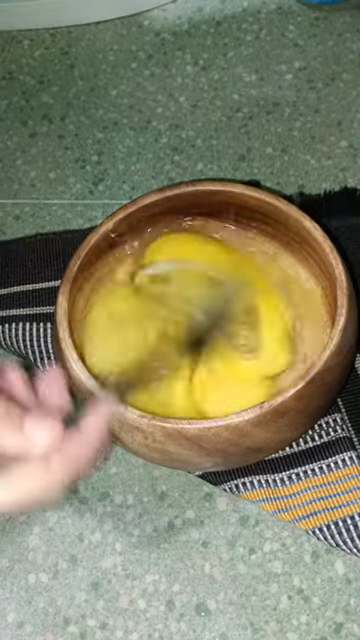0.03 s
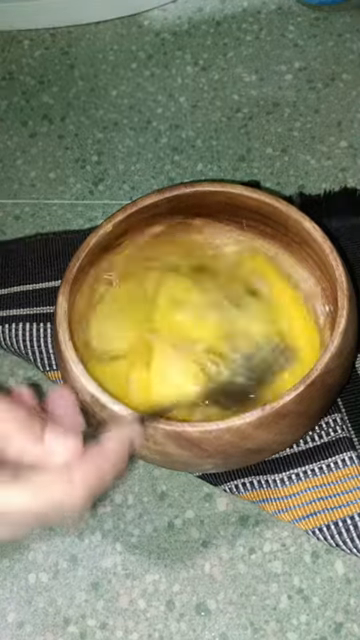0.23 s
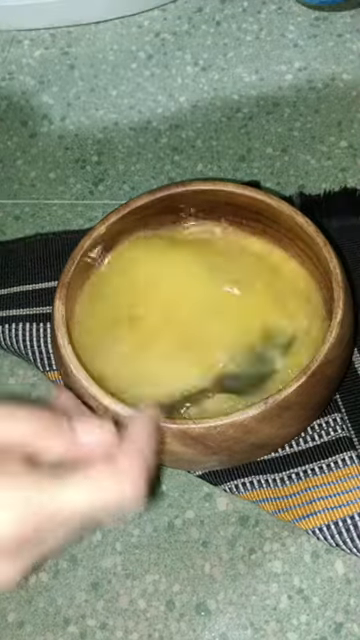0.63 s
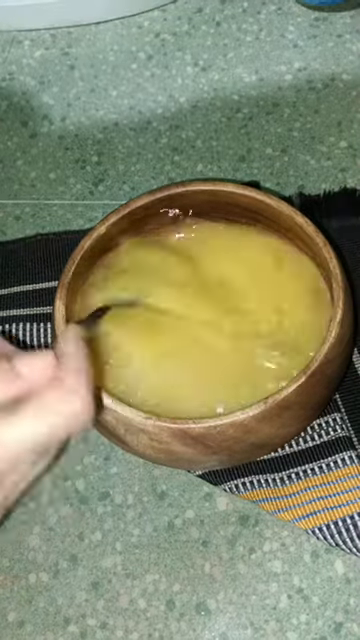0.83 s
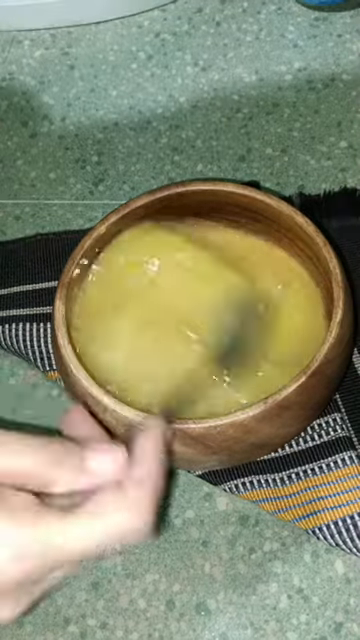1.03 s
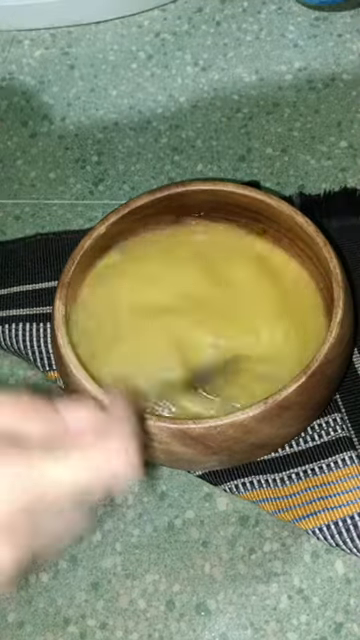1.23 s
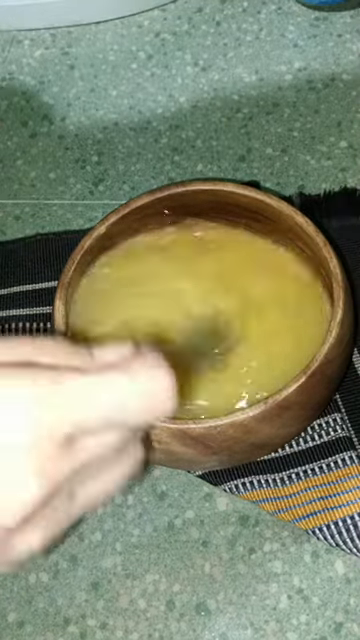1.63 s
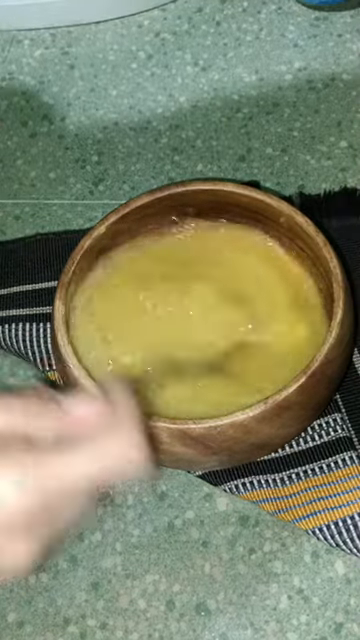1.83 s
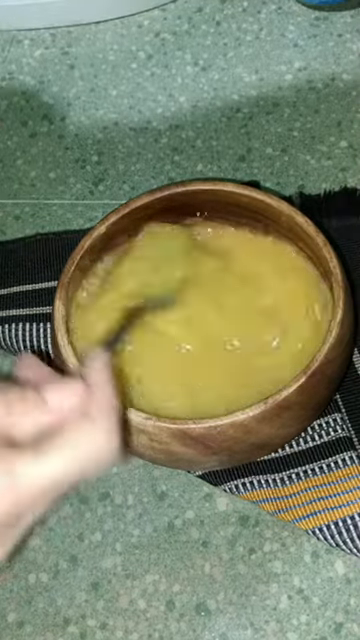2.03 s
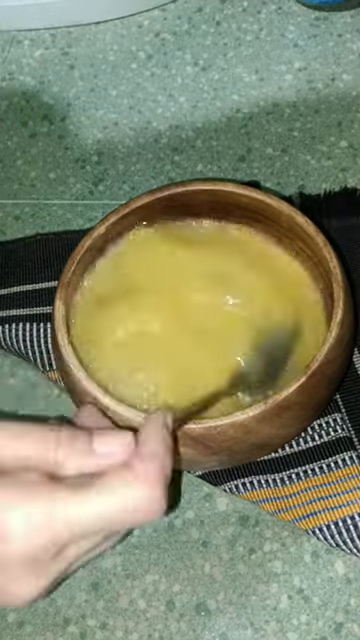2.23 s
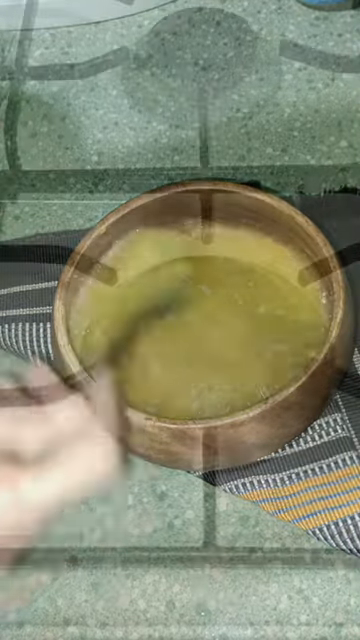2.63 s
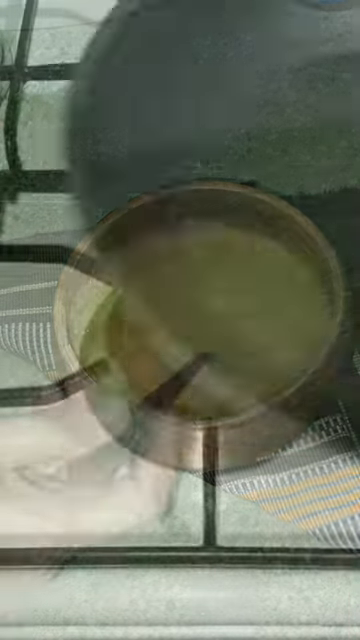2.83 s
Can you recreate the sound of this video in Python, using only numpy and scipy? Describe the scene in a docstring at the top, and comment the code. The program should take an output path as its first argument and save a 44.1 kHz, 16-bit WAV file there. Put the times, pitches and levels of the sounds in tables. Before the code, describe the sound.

Eggs being whisked with a fork, quick clacks and sloshes against a wooden bowl.

```python
"""A fork beats eggs in a wooden bowl on the counter of a small kitchen, about seven strokes a second.
From the first stroke, impacts ring the bowl, stick-slip friction rasps along the wood, and the egg
sloshes, sprays and gulps as trapped air resonates. Near 0.65 s a low rumble stops and the sound cuts
out twice for an instant. The spray then grows as the egg thins. From 2.2 s a thin hiss fades in,
and a faint tone rings under the last strokes."""
import sys
import numpy as np
from scipy import signal
from scipy.fft import rfft, irfft
from scipy.io import wavfile
from scipy.ndimage import uniform_filter1d

SR = 44100
rng = np.random.default_rng(int(sys.argv[2]) if len(sys.argv) > 2 else 0)


def wav_record(signal):
    """Record a signal, one row per channel, as 16-bit PCM in the file named by sys.argv[1]."""
    frames = np.transpose(np.atleast_2d(signal))
    bounded = np.clip(frames, -1, 1)
    # unit amplitude maps onto the largest positive 16-bit level
    quanta = np.round(bounded * 32767).astype(np.int16)
    wavfile.write(sys.argv[1], SR, quanta)


N = 132300

# Background spectra. Each row: frequency in Hz, relative density in dB.
AIR = [(25, -4.5), (60, -3.5), (150, 3.5), (280, -8), (600, -10.5), (1000, -7), (2100, -11.5),
       (3900, -16.5), (6000, -13.5), (11500, -25.5), (15500, -28)]
RUMBLE = [(20, -21), (45, 1.5), (90, -4), (140, -6.5), (220, -20), (500, -84)]
HISS = [(2000, -32), (6600, -19), (7350, 17), (8100, -35), (12000, -19)]
# Instants of silence. Each row: start in seconds, end in seconds.
DROPOUTS = [(0.637, 0.647), (0.680, 0.689)]
# Faint ringing. Each row: start in seconds, length in seconds, frequency in Hz, level in dB.
TONES = [(2.701, 0.16, 531, -57)]

# Reverberation of the kitchen. Each row: frequency in Hz, time to fall 60 dB in seconds.
ROOM_T60 = [(200, 0.38), (700, 0.17), (7000, 0.15)]
# Stereo balance. Each row: frequency in Hz, left minus right in dB.
BALANCE = [(100, 8), (350, -6), (620, -0.5), (1300, -7), (2800, -3.5), (11000, -2)]
ROOM_DB, LOW_CUT_HZ = -10.5, 348
WALLS_DB, WALLS_T60_S, WALLS_CUT_HZ, LEFT_LAG_SAMPLES = 1.5, 0.022, 920, 5

# Spectra of heavy slosh and fine spray. Each row: frequency in Hz, relative density in dB.
SLOSH = [(250, -15), (1200, -10.5), (2400, -2.5), (7000, -13), (15000, -82)]
SPRAY = [(1000, -25), (5000, 0.5), (8500, -4.5), (14700, -8.5), (15500, -13)]
# Spray grows as the egg thins. Each row: time in seconds, level against the scrape's treble in dB.
SPRAY_GROWTH = [(0.5, -11), (1.5, -6)]
SLOSH_DB, SLOSH_HANG_S, SPRAY_HANG_S = -8.5, 0.012, 0.0069
PULSES_PER_S, PULSE_SPREAD_DB, LEAD_S = 7700, 3.5, 0.014
# Air pockets in the egg. Each row: start in seconds, length in seconds, pitch in Hz, level in dB.
GULPS = [(0.219, 0.015, 1070, -49), (0.501, 0.00727, 1077, -52.5), (0.738, .04, 950, -55.5),
         (0.799, .008, 845, -50), (1.039, 0.016, 996, -47.5), (1.172, 0.06, 784, -50),
         (1.265, 0.018, 914, -49), (1.321, 0.11, 940, -45), (1.332, 0.073, 450, -48.5),
         (1.616, 0.045, 700, -51), (1.987, 0.03, 1040, -54), (2.156, 0.036, 787, -52),
         (2.298, .04, 1170, -48), (2.419, 0.016, 536, -56), (2.575, 0.039, 564, -45.5),
         (2.833, 0.023, 960, -54.5)]
BUBBLES_PER_S, BUBBLE_SPREAD, BUBBLE_CYCLES, BUBBLE_RISE_PER_S = 800, 0.29, 2.57, 4.6

# The fork rubs the bowl's floor. Each row: start in seconds, length in seconds, level in dB.
DRAGS = [(0.09, 0.026, -46), (0.374, 0.033, -44)]
DRAG_HZ, DRAG_WIDTH_HZ = 652, 46
# Tines slide on wood. Each row: start and length in seconds, crest as a share of the length,
# middle, treble and squeal levels in dB.
SCRAPES = [ (0.088, 0.037, 0.3, -40, -43.5, -70), (0.142, 0.027, 0.22, -37.5, -29, -36),
           (0.223, 0.028, 0.46, -45.5, -43, -70), (0.373, 0.042, 0.9, -42, -47, -64),
           (0.421, 0.026, 0.38, -38, -31, -29), (0.538, 0.039, 0.5, -43, -32, -28),
           (0.647, 0.017, 0.09, -36.5, -39.5, -68), (0.692, 0.08, 0.77, -41.5, -37, -49),
           (0.818, 0.031, 0.35, -51.5, -42, -56), (0.972, 0.02, 0.75, -46, -37.5, -64),
           (1.037, 0.022, 0.23, -37, -34, -41), (1.112, 0.015, 0.75, -38.5, -38.5, -60),
           (1.163, 0.044, 0.073, -36, -35, -46), (1.259, 0.022, 0.99, -43.5, -37.5, -67),
           (1.307, 0.041, 0.28, -34.5, -37.5, -57), (1.363, 0.11, 0.082, -51, -51.5, -68),
           (1.439, 0.053, 0.98, -45.5, -46, -62), (1.534, 0.02, 0.95, -50, -35.5, -60),
           (1.573, 0.07, 0.67, -38, -41, -45.5), (1.698, 0.032, 0.48, -40.5, -35.5, -47),
           (1.868, 0.043, 0.8, -45.5, -37.5, -45), (1.933, 0.018, 0.41, -36, -41.5, -64),
           (2.013, 0.041, 0.69, -41, -31, -35), (2.145, 0.027, 0.72, -46, -36, -38.5),
           (2.174, 0.042, 0.43, -38.5, -33, -41), (2.311, 0.05, 0.63, -36, -33, -42),
           (2.487, 0.035, 0.54, -38, -34.5, -47), (2.579, 0.022, 0.52, -38.5, -42.5, -68),
           (2.711, 0.024, 0.99, -39, -39, -72), (2.763, 0.031, 0.92, -52.5, -60, -76)]
# Spectrum of tines against wood. Each row: frequency in Hz, relative density in dB.
RASP = [(240, -45.5), (400, -29), (605, -12), (1190, -4.5), (2090, -2), (2320, -5.5), (4560, -4),
        (5480, -3.5), (11600, -14), (14100, -13), (15500, -25.5)]
# Resonances under the sliding tines. Each row: frequency in Hz, width in Hz, lift in dB.
TINE_MODES = [(1180, 174, 7), (2072, 220, 7.5), (2610, 310, 8.5), (3360, 790, 5.5), (6140, 310, 4),
              (11450, 750, 9.5)]
TINE_DRIFT = 0.027  # relative retuning from stroke to stroke
SWELL_DB, TAPER_DB, BITE_S, LIFT_S = 7.5, 6.5, 0.0044, 0.0083
SLIPS_PER_S, SLIP_SPREAD_DB, JUDDER_DB, JUDDER_S = 4000, 3.5, -1.5, 0.002
SQUEAL_HZ, SQUEAL_HALF_WIDTH_HZ = 4725, 164

# The fork strikes the bowl. Each row: start in seconds, body, middle and treble levels in dB,
# spot from 0 (floor) to 1 (wall).
KNOCKS = [(0.115, -23, -29, -35.5, 0.076), (0.1468, -48, -35.5, -27.5, 0), (0.245, -15, -18, -25, 0.13),
          (0.4199, -46, -38, -27, 0.075), (0.504, -58, -53, -34.5, 1), (0.541, -60, -37.5, -32.5, 0.42),
          (0.56, -65, -37, -32.5, 0.51), (0.652, -32.5, -53, -36.5, 1), (0.696, -32.5, -37, -36.5, 1),
          (0.8035, -44, -36, -41.5, 0), (0.9142, -28, -22.5, -28, 1), (0.983, -33, -30, -38, 0.99),
          (1.044, -53, -34, -33.5, 0.38), (1.126, -27, -34, -30.5, 0.54), (1.139, -23.5, -36, -32.5, 0),
          (1.17, -47, -45, -28, 0.41), (1.2765, -35.5, -38, -29.5, 1), (1.547, -44, -43, -37, 1),
          (1.575, -66, -34.5, -38.5, 0.81), (1.803, -46.5, -35, -35, 0.78), (1.936, -38, -35.5, -46, 1),
          (2.018, -54, -35.5, -42, 1), (2.164, -48, -33.5, -32, 0.86), (2.310, -37.5, -37, -43, 0.99),
          (2.444, -42.5, -41.5, -34.5, 0.77), (2.573, -34, -42.5, -40, 0.97), (2.589, -43, -45, -36, 1),
          (2.915, -53.5, -44.5, -57, 0.81)]
# Offsets to every knock: body, middle and treble in dB.
KNOCK_TRIM_DB = [-2, -2.5, -2]
# Modes of the bowl. Each row: frequency in Hz, level in dB when struck on the floor,
# level in dB when struck on the wall, time to fall 60 dB in seconds.
BOWL_MODES = [(400.6, -19, -10.5, 0.064), (463, -11.5, -19, 0.11), (642, 7.5, -17.5, 0.086),
              (721, 2.5, -0.5, 0.077), (1190, -22, -10, 0.11), (1480, -11, 4.5, 0.093),
              (2014, 3.5, 4.5, 0.072), (2280, 10, -18, .04), (2706, 13, 4, 0.018), (3376, -10, -6.5, 0.11),
              (5370, 15, -21, 0.029), (6460, 10.5, 8, 0.05)]
# Colour of the crack. Each row: frequency in Hz, gain on the floor in dB, gain on the wall in dB.
CRACK_COLOUR = [(300, -25, 4.5), (516, -8.5, -1), (845, 1.5, -8.5), (1000, -22, 5.5), (1550, -22, -7.5),
                (1940, 2.5, -2.5), (2800, 5.5, -6.5), (3970, -9, -2.5)]
CRACK_DB, CRACK_T60_S, KNOCK_WINDOW_S, KNOCK_LEAD_IN_DB = 25, 0.017, 0.014, -12.5


def amp(db):
    """Amplitude ratio from decibels."""
    return 10 ** (np.asarray(db) / 20)


def unit(x):
    """Normalisation to an rms of 1."""
    return x / np.sqrt(np.mean(x ** 2) + 1e-20)


def read(points, hz):
    """Interpolation on a logarithmic frequency axis."""
    f, value = np.transpose(points)
    return np.interp(np.log(hz + 1), np.log(f + 1), value)


def add(mix, start, sound):
    """Superposition of a sound on the mix, from a start in seconds."""
    part = mix[..., max(round(start * SR), 0):][..., :sound.shape[-1]]
    part += sound[..., :part.shape[-1]]


def colour(x, curve):
    """Minimum-phase filtering with a gain of curve(Hz) in dB."""
    hz = abs(np.fft.fftfreq(4096, 1 / SR))
    log_gain = np.log(amp(np.maximum(curve(hz), -100)))
    taps = np.fft.ifft(np.exp(np.conj(signal.hilbert(log_gain)))).real[:2048]
    return signal.fftconvolve(x, taps)[:len(x)]


def equalise(x, seconds, levels_db):
    """Equalisation of body, middle and treble (or the last two) by mean power over a duration."""
    bands = [(350, 900), (1000, 3000), (3500, 14000)][-len(levels_db):]
    hz = np.fft.rfftfreq(len(x), 1 / SR)
    power = 2 * abs(rfft(x)) ** 2 / (len(x) * seconds * SR)
    gains = [db - 10 * np.log10(power[(hz > lo) & (hz < hi)].sum() + 1e-20)
             for db, (lo, hi) in zip(levels_db, bands)]
    corners_hz = [350, 800, 1200, 2700, 3900, 14000][-2 * len(gains):]
    return colour(x, lambda f: read(list(zip(corners_hz, np.repeat(gains, 2))), f))


def uneven_sizes(count, spread_db):
    """Heavy-tailed amplitudes: a few events are much larger than the rest."""
    return amp(spread_db * np.minimum(rng.exponential(1, count), 4))


def background(spectrum, level_db):
    """Stationary noise whose coherence between the ears falls from bass to treble."""
    hz = np.fft.rfftfreq(N, 1 / SR)
    mid, side = rfft(rng.standard_normal((2, N))) * amp(read(spectrum, hz))
    side *= amp(read([(40, -21), (180, -7.5), (1200, 0.0)], hz))
    return amp(level_db) * unit(irfft(np.array([mid + side, mid - side]), N))


def faint_tone(length, hz, level_db):
    """A pure tone under a tapered envelope."""
    t = np.arange(int(length * SR)) / SR
    return amp(level_db) * unit(signal.windows.tukey(len(t)) * np.sin(2 * np.pi * hz * t))


def room_response():
    """Reverberation: sparse reflections decay exponentially, slowest in the bass."""
    taps = rng.choice([-1., 1.], (2, SR // 2)) * (rng.random((2, SR // 2)) < .15)
    taps[:, :SR // 1000] = 0
    hz, t, spectra = signal.stft(taps, SR, nperseg=256)
    width = read([(700, 0.36), (1500, 1.0)], hz)[:, None]  # the ears nearly share the bass
    spectra[0] = width * spectra[0] + np.sqrt(1 - width ** 2) * spectra[1]
    decay = amp(-60 * t / read(ROOM_T60, hz)[:, None])
    response = signal.istft(spectra * decay, SR, nperseg=256)[1]
    return response / np.linalg.norm(response[0])


def kitchen(x):
    """Radiation into a room: the small bowl emits little bass, and reverberation follows."""
    direct = signal.sosfilt(signal.butter(3, LOW_CUT_HZ, "high", fs=SR, output="sos"), x)
    reverb = signal.fftconvolve(direct, room_response(), axes=1)[:, :N]
    left, right = amp(-4.5) * (direct + amp(ROOM_DB) * reverb)
    return np.array([colour(left, lambda f: read(BALANCE, f) / 2),
                     colour(right, lambda f: -read(BALANCE, f) / 2)])


def in_bowl(x):
    """Early reflections from the bowl's walls, new for each fork position, join the direct sound."""
    t = np.arange(SR // 25) / SR
    taps = rng.standard_normal((2, len(t))) * (rng.random((2, len(t))) < .2)
    taps *= amp(-60 * t / WALLS_T60_S)
    taps = amp(WALLS_DB) * taps / np.linalg.norm(taps, axis=1, keepdims=True)
    taps = signal.sosfilt(signal.butter(2, WALLS_CUT_HZ, "high", fs=SR, output="sos"), taps)
    taps[0, LEFT_LAG_SAMPLES] += 1  # the direct path is shorter to the right ear
    taps[1, 0] += 1
    return signal.fftconvolve(x[None], taps, axes=1)


def patter(length, spectrum, level_db, hang_s):
    """Shot noise that swells and lingers; in slosh and spray its pulses are droplets and froth."""
    t = np.arange(int((length + 0.057) * SR)) / SR
    pulses = rng.standard_normal(len(t)) * uneven_sizes(len(t), PULSE_SPREAD_DB)
    pulses *= rng.random(len(t)) < PULSES_PER_S / SR
    rise = np.minimum(t / (2 * LEAD_S), 1) ** 2
    fall = np.exp(-np.maximum(t - LEAD_S - length, 0) / hang_s)
    return amp(level_db) * rise * fall * unit(colour(pulses, lambda f: read(spectrum, f)))


def gulp(length, pitch_hz, level_db):
    """Bubble resonance: each heavily damped bubble of a cluster rises in pitch as it closes."""
    t = np.arange(SR // 20) / SR
    cluster = np.zeros(int(length * SR) + len(t))
    count = int(length * BUBBLES_PER_S) + 1
    for k, (jitter, tuning, strength) in enumerate(rng.random((count, 3))):
        hz = pitch_hz * np.exp(BUBBLE_SPREAD * (2 * tuning - 1))
        envelope = np.exp(-hz * t / BUBBLE_CYCLES) * (1 - np.exp(-2 * hz * t))
        chirp = np.sin(2 * np.pi * hz * (t + BUBBLE_RISE_PER_S * t ** 2 / 2))
        add(cluster, length * (k + jitter) / count, (0.11 + strength) * envelope * chirp)
    return amp(level_db) * unit(cluster) * np.sqrt(len(cluster) / (length * SR))


def drag(length, level_db):
    """Forced vibration: growing friction drives the bowl's hollow resonance, which rings on."""
    t = np.arange(int((length + 0.082) * SR)) / SR
    rub = rng.standard_normal(len(t)) * np.sqrt(t / length) * (t < length)
    hum = colour(rub, lambda f: -10 * np.log10(
        1 + ((f ** 2 - DRAG_HZ ** 2) / (DRAG_HZ * DRAG_WIDTH_HZ)) ** 2))
    return amp(level_db) * unit(hum) * np.sqrt(t[-1] / length)


def scrape(length, crest, middle_db, treble_db, squeal_db):
    """Stick-slip friction excites tines and wood as pressure swells and eases; one tine may squeal."""
    t = np.arange(int((length + 0.11) * SR)) / SR
    pressure = amp(np.interp(t / length, [0, np.clip(crest, .02, .98), 1], [-SWELL_DB, 0, -TAPER_DB]))
    pressure *= np.minimum(t / BITE_S, 1) * np.exp(-np.maximum(t - length, 0) / LIFT_S)
    judder = amp(JUDDER_DB * unit(uniform_filter1d(rng.standard_normal(len(t)), int(JUDDER_S * SR) + 1)))
    slipping = rng.random(len(t)) < SLIPS_PER_S / SR
    slips = slipping * uneven_sizes(len(t), SLIP_SPREAD_DB) * rng.choice([-1, 1], len(t))
    tunings = 1 + TINE_DRIFT * rng.standard_normal(len(TINE_MODES))
    rasp = colour(slips * pressure * judder, lambda f: read(RASP, f) + sum(
        db / (1 + (2 * (f - hz * tuning) / width) ** 2)
        for (hz, width, db), tuning in zip(TINE_MODES, tunings)))
    squeal = colour(slips * pressure ** 3,
                    lambda f: -20 * np.log10(1 + ((f - SQUEAL_HZ) / SQUEAL_HALF_WIDTH_HZ) ** 2))
    squeal = amp(squeal_db) * unit(squeal) * np.sqrt(length / t[-1])
    return equalise(rasp, length, [middle_db, treble_db]) + squeal


def knock(levels_db, spot):
    """Impact: a wet crack, then free decay of the bowl's modes, hollow on the floor, hard on the wall."""
    t = np.arange(SR // 4) / SR
    blend = np.array([1 - spot, spot])
    ring = np.zeros(len(t))
    for hz, *floor_wall_db, t60 in BOWL_MODES:
        envelope = amp(blend @ floor_wall_db + 0.62 * rng.standard_normal() - 60 * t / t60)
        tuning = 1 + min(hz / 250000, .02) * rng.standard_normal()
        ring += envelope * np.sin(2 * np.pi * hz * tuning * t) * rng.choice([-1, 1])
    tint = [(hz, blend @ floor_wall_db) for hz, *floor_wall_db in CRACK_COLOUR]
    noise = colour(rng.standard_normal(len(t)), lambda f: read(RASP, f) + read(tint, f))
    crack = unit(noise) * amp(CRACK_DB - 60 * t / CRACK_T60_S)
    return equalise(ring + crack, KNOCK_WINDOW_S, np.add(levels_db, KNOCK_TRIM_DB))


def scene():
    """Superposition of fork, bowl and egg in the kitchen with quiet air, early rumble and late hiss."""
    bowl, t = np.zeros((2, N)), np.arange(N) / SR
    for start, *levels_db, spot in KNOCKS:
        add(bowl, start, in_bowl(knock(levels_db, spot)))
        # a faint rasping noise swells just before each knock
        knock_lead_in = patter(KNOCK_WINDOW_S, RASP, levels_db[-1] + KNOCK_LEAD_IN_DB, hang_s=0.012)
        add(bowl, start - LEAD_S, in_bowl(knock_lead_in))
    for start, length, crest, middle_db, treble_db, squeal_db in SCRAPES:
        add(bowl, start, in_bowl(scrape(length, crest, middle_db, treble_db, squeal_db)))
        slosh = patter(length, SLOSH, middle_db + SLOSH_DB, SLOSH_HANG_S)
        spray_db = treble_db + np.interp(start, *np.transpose(SPRAY_GROWTH))
        spray = patter(length, SPRAY, spray_db, SPRAY_HANG_S)
        add(bowl, start - LEAD_S, in_bowl(slosh + spray))
    for start, *rub in DRAGS:
        add(bowl, start, in_bowl(drag(*rub)))
    for start, *pocket in GULPS:
        add(bowl, start, in_bowl(gulp(*pocket)))
    for start, *tone in TONES:
        add(bowl, start, faint_tone(*tone))
    rumble = background(RUMBLE, level_db=-50) * (t < DROPOUTS[0][1])  # ends with the first silence
    hiss = background(HISS, level_db=-64) * np.interp(t, [2.2, 2.73], [0, 1])
    return kitchen(bowl) + background(AIR, level_db=-56.5) + rumble + hiss


def record(dry):
    """Gating cuts the sound twice for an instant; low-pass filtering ends the band at 15.5 kHz."""
    t = np.arange(N) / SR
    gate = 1. - sum((t > start) & (t < end) for start, end in DROPOUTS)
    gate = uniform_filter1d(gate, 64)
    low_pass = signal.firwin(161, 15500, window=("kaiser", 9), fs=SR)
    return signal.oaconvolve(dry * gate, low_pass[None], "same")


dry = scene()
out = record(dry)
wav_record(out)
```